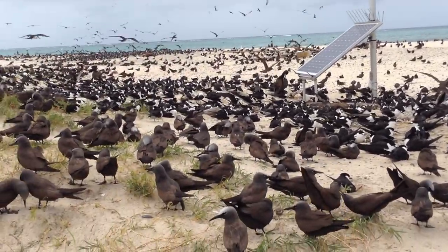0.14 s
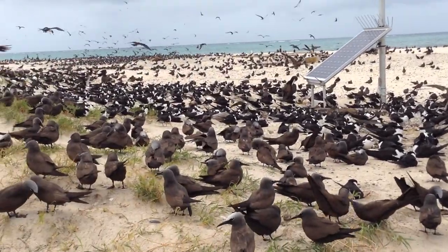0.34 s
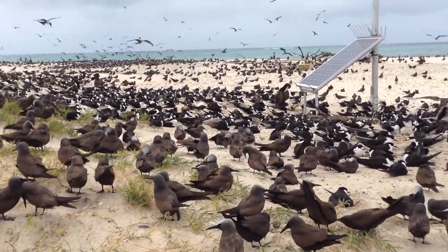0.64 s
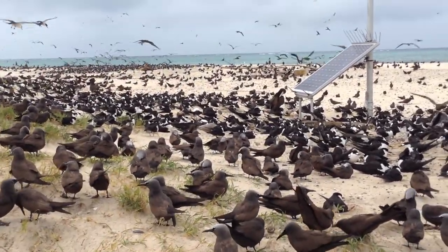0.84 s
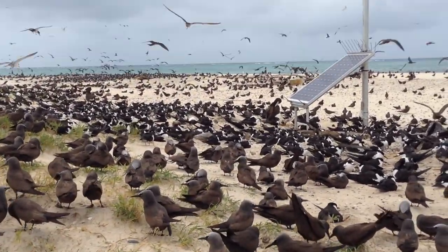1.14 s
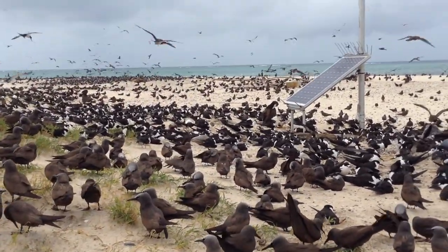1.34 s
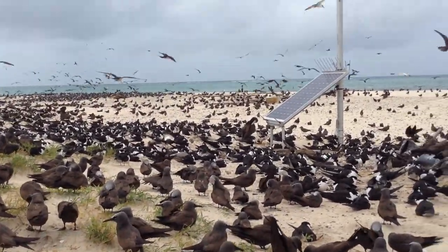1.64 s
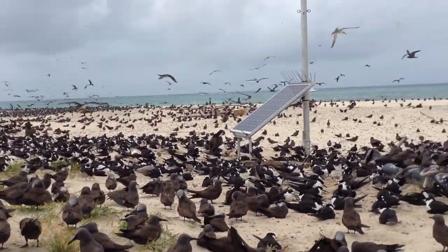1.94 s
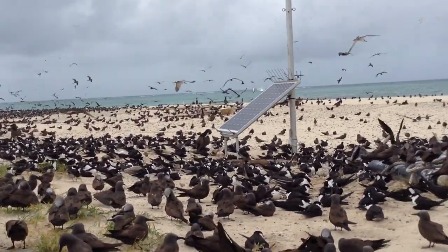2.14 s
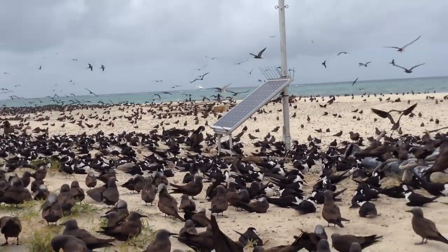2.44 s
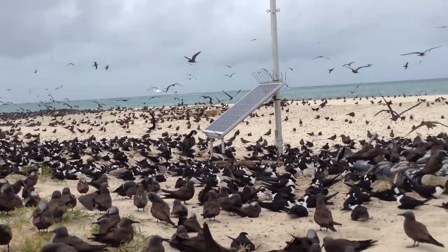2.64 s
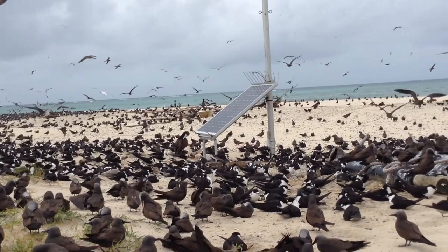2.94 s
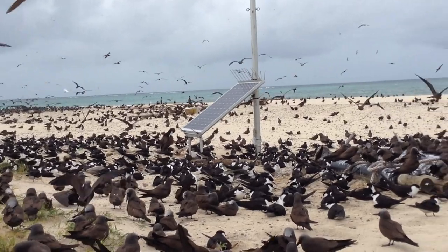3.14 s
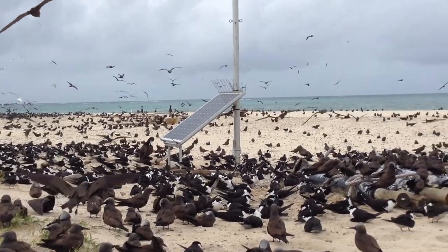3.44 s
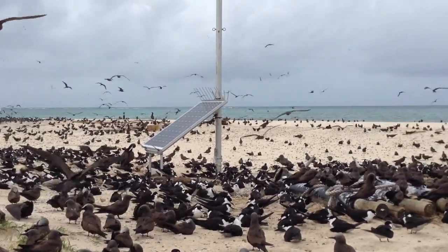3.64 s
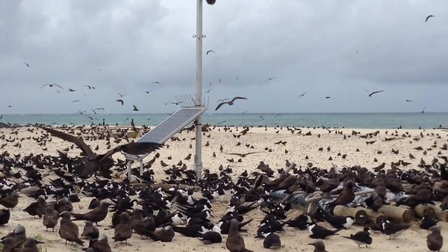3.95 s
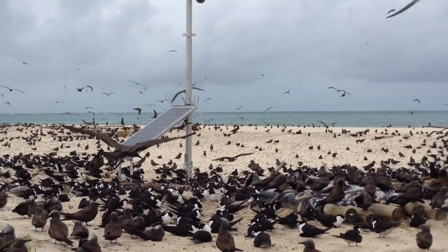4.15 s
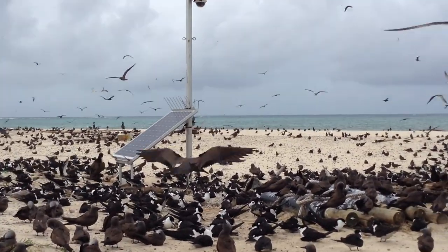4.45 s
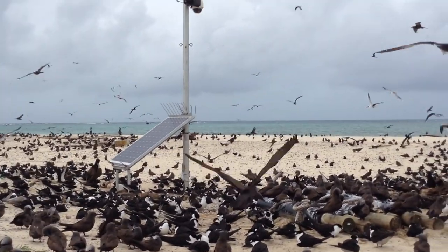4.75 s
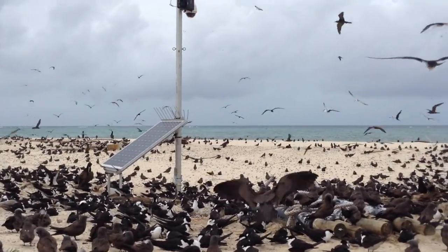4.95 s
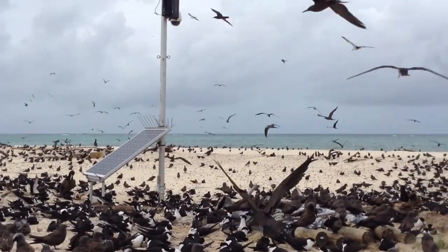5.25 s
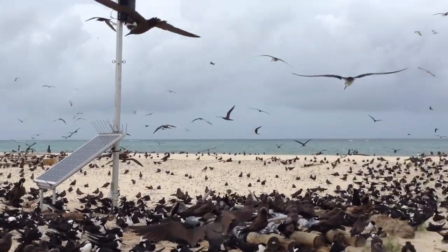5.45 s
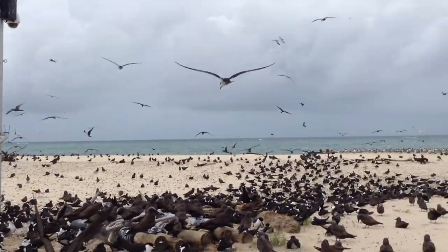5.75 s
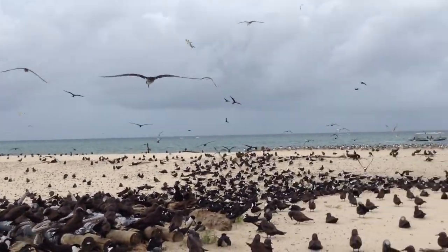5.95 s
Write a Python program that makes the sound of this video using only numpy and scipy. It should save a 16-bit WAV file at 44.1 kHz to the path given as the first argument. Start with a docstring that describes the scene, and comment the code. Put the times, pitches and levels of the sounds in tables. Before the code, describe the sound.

A dense seabird colony calls without a break outdoors by the sea. Brief, harsh, squealing cries from close birds stand out over a mass of overlapping squawks and a soft hiss of far birds and surf. Gusts hit the small microphone from the start with a low rumble and short thumps, becoming lighter later, and the bird din peaks shortly before the end.

```python
"""A windy beach with a crowded seabird colony, heard by a small mono microphone.
Near terns squeal: overtone stacks on a bending pitch, shaped by the throat, echoed by the sand.
Behind them hundreds of squawks form the din of the flock; far birds and surf blur into a hiss.
Gusts rumble and shove the microphone membrane, giving short low thumps."""
import sys
import numpy as np
from scipy import signal
from scipy.fft import rfft, irfft, next_fast_len
from scipy.io import wavfile
from scipy.ndimage import uniform_filter1d, minimum_filter1d

SR = 44100
rng = np.random.default_rng(int(sys.argv[2]) if len(sys.argv) > 2 else 0)


def wav_record(signal):
    """Record a signal, one row per channel, as 16-bit PCM in the file named by sys.argv[1]."""
    frames = np.transpose(np.atleast_2d(signal))
    bounded = np.clip(frames, -1, 1)
    # unit amplitude maps onto the largest positive 16-bit level
    quanta = np.round(bounded * 32767).astype(np.int16)
    wavfile.write(sys.argv[1], SR, quanta)


N = 268921
BAND_LIMIT_HZ = 15380


def amp(db):
    return 10 ** (np.asarray(db) / 20)


def unit_rms(x):
    return x / np.sqrt(np.mean(x ** 2) + 1e-20)


def db_at(spectrum, hz):
    f_hz, db = np.transpose(spectrum)
    return np.interp(np.log(hz + 1), np.log(f_hz + 1), db)


def add(mix, start_s, sound):
    start = round(start_s * SR)
    sound = sound[max(-start, 0):]
    part = mix[max(start, 0):][:len(sound)]
    part += sound[:len(part)]


def coloured(x, spectrum):
    """Filter x by a table of f/Hz, gain/dB."""
    size = next_fast_len(len(x))
    gain = amp(db_at(spectrum, np.fft.rfftfreq(size, 1 / SR)))
    return irfft(rfft(x, size) * gain, size)[:len(x)]


def wander(length, hz):
    """Smooth random curve, rms 1, hz knots a second."""
    knots = rng.standard_normal(800)
    position = np.arange(length) * hz / SR
    index = position.astype(int)
    blend = np.sin(np.pi / 2 * (position - index)) ** 2
    return unit_rms(knots[index] * (1 - blend) + knots[index + 1] * blend)


def far_hiss(patchy_db=1.13, flicker_db=0.5):
    """Farthest birds and surf: noise with drifting spectral patches."""
    frames = N // 128 + 5
    real, imag, patches = rng.standard_normal((frames, 257, 3)).T
    patches = unit_rms(uniform_filter1d(uniform_filter1d(patches, 8, 0), 16, 1))
    flicker = unit_rms(uniform_filter1d(rng.standard_normal(frames), 5))
    spectra = (real + 1j * imag) * amp(patchy_db * patches + flicker_db * flicker)
    return unit_rms(signal.istft(spectra, nperseg=512, noverlap=384)[1][:N])


def squawks(count=680, length=3700):
    """Birds at middle distance: harmonics 2-6, each call with its own pitch, bend and duration."""
    when, pitch, slope, arch, span, strength = rng.random((count, 6)).T[..., None]
    u = np.arange(length) / (length * (.35 + .65 * span))  # 0-1 over 30-85 ms
    bend = .6 * (slope - .4) * u + .5 * (arch - .4) * np.sin(np.pi * u)
    jitter = unit_rms(uniform_filter1d(rng.standard_normal((count, length)), size=150, axis=1))
    turns = np.cumsum((680 + 420 * pitch) * np.exp(bend + .008 * jitter), axis=1) / SR
    harmonic_db = np.array([-4.5, 0.5, -0.5, -9.5, -3.5]) + 3.1 * rng.standard_normal((count, 5))
    calls = sum(amp(harmonic_db[:, [k]]) * np.cos(2 * np.pi * (k + 2) * turns) for k in range(5))
    envelope = np.sin(np.pi * np.minimum(u, 1)) ** .6
    calls *= envelope * (1 + .25 * jitter[::-1]) * amp(7 * strength)
    out = np.zeros(N)
    for start_s, call in zip((when[:, 0] * (N + length) - length) / SR, calls):
        add(out, start_s, call)
    return unit_rms(out)


def flock(squawks_db=-6.5, split_hz=5500, surge_db=.5, surge_hz=12, flicker_db=1.5, flicker_hz=28):
    """Squawks and hiss through one filter; the level swells and ducks, the treble flickers."""
    # level and brightness of the din as heard, ducking suddenly after some strong wind buffets:
    # t/s, level/dB, treble re body/dB
    levels = [(0.0, -26, -12), (0.07, -29, -19), (0.19, -32, -11), (0.63, -29.5, -15), (0.76, -24.5, -13.5),
              (0.83, -28, -15), (1.1, -29, -15.5), (1.31, -32.5, -15.5), (1.53, -31, -16), (1.87, -29, -16),
              (1.92, -28.5, -13), (2.11, -29, -19), (2.44, -27, -15.5), (2.51, -32, -15.5),
              (2.85, -26, -17.5), (3.04, -32.5, -15), (3.38, -28.5, -13.5), (3.55, -30, -13.5),
              (4.01, -26, -15.5), (4.26, -26.5, -12.5), (4.52, -23.5, -16), (4.96, -26, -13),
              (4.98, -23.5, -12), (5.54, -23.5, -15.5), (5.55, -33.5, -15), (5.81, -28.5, -16.5),
              (6.1, -29.5, -14)]
    # colour of the din: f/Hz, gain/dB
    din_spectrum = [(290, -60), (500, -36), (545, -35), (675, -18), (926, -11), (1080, -11.5), (1270, -9.5),
                    (1360, -11.5), (2150, 0), (2830, 0.5), (3990, -6.5), (4810, -7), (6400, -10.5),
                    (11200, -20.5), (15300, -31)]
    t_s, *columns = np.transpose(levels)
    level_db, treble_db = (np.interp(np.arange(N) / SR, t_s, column) for column in columns)
    din = coloured(amp(squawks_db) * squawks() + far_hiss(), din_spectrum)
    body = signal.oaconvolve(din, signal.firwin(101, split_hz, fs=SR), "same")
    level_db += surge_db * wander(N, surge_hz)  # birds join and stop
    treble_db += flicker_db * wander(N, flicker_hz)
    return amp(level_db) * (unit_rms(body) + amp(treble_db) * unit_rms(din - body))


def buffet(db, hz, width_ms, turbulence, max_drive_db=-2.5):
    """A few uneven membrane swings, rising faster than they die, plus a puff of turbulence."""
    t_s = np.arange(-1500, 1500) / SR
    swing_hz = hz * np.exp(0.1944 * wander(len(t_s), hz))
    swing = np.cos(2 * np.pi * (np.cumsum(swing_hz) / SR + rng.random()))
    flank_s = np.where(t_s < 0, 0.82, 1.01) * width_ms / 1000
    envelope = np.exp(-4 * np.log(2) * (t_s / flank_s) ** 2)
    push = amp(min(db, max_drive_db)) * envelope * (swing + 0.5 * turbulence)
    # strong pushes drive the membrane unevenly, which sharpens them
    return push + 0.52 * push ** 2 + 0.29 * push ** 3


def wind(lumps_db=4.0, lumps_hz=60, weak_count=75):
    """Air on the microphone: lumpy rumble and weak random buffets follow the gusts; strong ones on top."""
    # turbulence spectrum: f/Hz, relative density/dB
    rumble_spectrum = [(12, -65), (20, -53), (59, -1.5), (166, 3), (238, 2), (489, -11), (536, -11.5),
                       (812, -21), (905, -25.5), (1350, -37), (1500, -31), (1950, -79), (3300, -120)]
    # wind strength: t/s, rumble level/dB
    gusts = [(0.0, -27), (0.2, -28), (0.36, -22.5), (0.85, -32), (1.03, -19.5), (1.2, -33), (1.39, -28.5),
             (1.51, -24), (1.65, -34.5), (1.87, -32.5), (2.24, -30), (2.38, -33.5), (2.56, -30.5),
             (2.87, -29.5), (4.06, -34), (4.31, -33), (4.74, -28), (5.11, -31), (5.28, -27), (5.37, -25.5),
             (5.5, -37), (6.1, -43.5)]
    # strongest shoves of air: t/s, drive before the cap/dB, f/Hz, nominal width/ms
    strong_buffets = [(0.021, -11.5, 317, 2.8), (0.133, -2.5, 286, 11.3), (0.143, -24, 283, 11),
                      (0.173, -4.5, 247, 7.1), (0.181, -12, 265, 7.4), (0.2, -16, 277, 30),
                      (0.226, -9, 290, 2.1), (0.233, -8.5, 441, 2.3), (0.242, -9.5, 229, 16),
                      (0.256, -11, 280.4, 9.6), (0.266, -12.5, 346, 16), (0.272, -11, 354.5, 7),
                      (0.334, -10, 304, 2.7), (0.359, -12.5, 324, 6.6), (0.381, -14.5, 209, 11),
                      (0.446, -0.5, 243.5, 7), (0.457, -17, 297, 3.2), (0.494, -10, 289, 6.1),
                      (0.501, -11, 265, 3.9), (0.508, -16, 248.4, 17), (0.52, -14.5, 317, 11),
                      (0.537, -12, 313, 9.1), (0.581, -7.6, 209, 8.2), (0.59, -8, 309.6, 4.7),
                      (0.669, -5.5, 242.6, 14), (0.81, -7, 316.0, 2.6), (0.825, -9, 244.0, 14),
                      (0.836, -4.5, 233.5, 3), (0.88, -19, 330, 27), (0.916, -8.2, 297, 3.8),
                      (0.925, -17.5, 257.0, 18), (0.934, -9, 295.4, 2.9), (0.943, -10.5, 327, 6.8),
                      (0.955, -7, 296.4, 1.3), (0.968, -9, 250, 19), (0.989, -17.5, 256, 21),
                      (1.036, -20, 270, 40.0), (1.06, -7.5, 322, 4.4), (1.077, -22, 231, 18.7),
                      (1.096, -8, 255, 3.3), (1.127, -20, 266, 38), (1.137, -12, 285, 4.2),
                      (1.151, -3.5, 322, 4.2), (1.17, -3, 302.5, 9.1), (1.195, 3, 327.6, 4.4),
                      (1.203, -12.5, 342.4, 36), (1.354, -11, 270, 9.6), (1.37, -12.5, 298, 4.1),
                      (1.377, -9, 256, 4.1), (1.385, -2, 521, 2), (1.387, -12.5, 436, 14.6),
                      (1.395, -2, 460, 8.9), (1.406, -6.5, 333.0, 3.5), (1.42, -3.5, 437, 1.4),
                      (1.428, -11, 314, 7.7), (1.446, -9.5, 265, 5.3), (1.454, -15, 245.0, 28),
                      (1.477, -2, 249, 3), (1.487, -6, 289, 5.2), (1.494, -17, 328, 14),
                      (1.525, -24, 245, 12), (1.558, -14, 330, 18), (1.569, -6.5, 293.7, 4.2),
                      (1.579, -4, 285, 5.2), (1.588, -6, 346, 6.3), (1.594, -12.9, 299.6, 23),
                      (1.599, -8.6, 269, 1.4), (1.617, -5, 299.0, 4.6), (1.625, -9.5, 276, 10),
                      (1.639, -6.5, 355, 5.2), (1.646, -11, 326.4, 6.4), (1.834, -17, 238.3, 15),
                      (1.945, -11, 303.3, 7.7), (1.956, -12.4, 317.6, 2.6), (1.969, -11, 250, 4.4),
                      (2.106, -10, 302, 6.5), (2.115, -21, 270, 26), (2.124, -10, 430, 3.6),
                      (2.132, -10.5, 310, 7.7), (2.144, -2, 286, 9.8), (2.159, -9.5, 270, 4.3),
                      (2.176, -12.5, 338.6, 2.9), (2.184, -14.9, 260.0, 5.0), (2.219, -13.5, 232, 21),
                      (2.236, -18.9, 328.5, 22), (2.308, -15.1, 300, 2.6), (2.322, -19.0, 269, 47),
                      (2.364, -18, 274, 5.3), (2.372, -12.5, 338, 2.7), (2.52, -20, 222.4, 7),
                      (2.55, -17.5, 249, 19), (2.599, -14, 299, 4.5), (2.78, -16.5, 205, 7.3),
                      (2.878, -2.5, 303, 5.1), (2.919, -16, 292, 56), (2.944, -7, 259, 5.7),
                      (2.956, -10, 295, 4.8), (2.966, -11, 293.0, 13.3), (2.976, -14, 308.0, 20),
                      (2.985, -5, 354, 8.6), (3.039, -16.5, 215.5, 7.6), (3.079, -16.3, 247, 7.6),
                      (3.409, -18, 277, 19), (3.416, -13.7, 263, 6.1), (3.513, -4, 239.3, 3.1),
                      (3.529, -15, 230, 8.7), (3.571, -18, 269, 8.0), (3.647, -19.5, 244, 4.7),
                      (3.798, -22, 381, 5.6), (3.83, -16, 242, 3.4), (3.942, -10, 246.6, 6.1),
                      (3.958, -7.9, 219.4, 4.4), (4.111, -16.5, 217, 5), (4.176, -19, 237.5, 4.5),
                      (4.245, -15.8, 226, 4.2), (4.274, -14, 281.5, 5.1), (4.356, -14, 279.5, 8.3),
                      (4.45, -13.5, 245, 4.7), (4.54, -16, 374, 3.5), (4.554, -9.5, 301, 9.8),
                      (4.652, -13, 239.0, 5.5), (4.695, -21, 260, 11.8), (4.767, -13.5, 241.8, 7.7),
                      (4.812, -12, 210, 7.7), (4.83, -10.5, 207.6, 11), (4.842, -18, 260, 3.3),
                      (4.849, -13.7, 233, 3.2), (4.88, -14, 276, 4.8), (4.905, -18, 264, 23),
                      (5.075, -18, 277, 12), (5.09, -10.5, 224, 5.8), (5.111, -27, 200, 25.3),
                      (5.133, -14.5, 334, 3.4), (5.276, -10, 269, 4.2), (5.39, -15.8, 272, 4.8),
                      (5.42, -14.5, 236.7, 22), (5.428, -10.5, 290.6, 4.7), (5.436, -19, 255, 46),
                      (5.524, -6, 266.7, 2.2), (5.533, -16, 269, 12.2), (5.546, -2.5, 372, 5.5),
                      (5.752, -14.5, 211.5, 4.8)]
    air = unit_rms(coloured(rng.standard_normal(N + 3000), rumble_spectrum))
    gust_s, gust_db = np.transpose(gusts)
    rumble_db = np.interp(np.arange(N) / SR, gust_s, gust_db) + lumps_db * wander(N, lumps_hz)
    out = air[:N] * amp(rumble_db)
    weak_s = rng.random(weak_count) * N / SR
    strength, pitch, span = rng.standard_normal((weak_count, 3)).T
    weak_db = np.interp(weak_s, gust_s, gust_db) + 6.5 + 3 * strength
    weak_hz, weak_ms = 260 * np.exp(0.165 * pitch), 5.6 * np.exp(0.57 * span)
    for centre_s, db, hz, width_ms in [*strong_buffets, *zip(weak_s, weak_db, weak_hz, weak_ms)]:
        start = rng.integers(N)
        add(out, centre_s - 1500 / SR, buffet(db, hz, width_ms, air[start:start + 3000]))
    return out


def cry(length_s, start_hz, middle_hz, end_hz, db, high_db, ends_db=-7, waver_db=1.2, waver_hz=45):
    """One tern syllable: 15 slightly raspy harmonics on a bending pitch, shaped by the throat."""
    # throat response: f/Hz, gain/dB
    throat = [(700, 5), (1100, 0), (1900, 6.5), (2300, 19.5), (2900, 19.5), (3350, 18.5), (3800, 10.5),
              (4400, -4), (5500, -2), (7500, -1), (9000, -4), (12000, -11), (15000, -10)]
    length = round(length_s * SR)
    u = np.linspace(-1, 1, length)
    hz = middle_hz + (end_hz - start_hz) / 2 * u + ((start_hz + end_hz) / 2 - middle_hz) * u ** 2
    level_db = db + ends_db * u ** 4 + waver_db * wander(length, waver_hz)
    jitter, rasp = wander(length, 250), wander(length, 250)
    turns = np.cumsum(hz * (1 + .003 * jitter)) / SR
    order = np.arange(1, 16)[:, None]
    gain = amp(db_at(throat, order * hz) + 6 * (order == 3))  # harmonic 3 carries the cry
    gain *= order * hz < BAND_LIMIT_HZ
    low, high = gain[:4], gain[4:] * amp(-3 * order[4:])
    low = low / np.linalg.norm(low, axis=0)
    high = high / np.linalg.norm(high, axis=0) * amp(high_db)
    phase = 2 * np.pi * (order * turns + rng.random(order.shape))
    voice = np.sqrt(2) * (np.vstack([low, high]) * np.cos(phase)).sum(0)
    return voice * (1 + .2 * rasp) * amp(level_db) * signal.windows.tukey(length, .15)


def near_terns(echo_db=-9, echo_s=90 / SR):
    """The clearest cries, each with a weaker copy thrown back by the sand."""
    # syllables: t/s, length/s, start f/Hz, middle f/Hz, end f/Hz, level/dB, harmonics 5-15 re 1-4/dB
    syllables = [ (0.0, 0.05, 841, 830, 826, -35, -17), (0.437, 0.043, 737, 785, 734, -46, 6),
                 (0.618, 0.058, 755, 781, 880, -33, -15), (0.679, 0.045, 760, 743, 710, -39, 7),
                 (0.724, 0.089, 745, 864, 777, -32.5, -1.5), (0.869, 0.023, 896, 930, 980, -37, -16),
                 (0.917, 0.064, 878, 1000, 1026, -35.5, -26), (0.962, 0.059, 602, 718, 788, -29, -18),
                 (1.025, 0.042, 804, 764, 718, -21.5, -26), (1.02, 0.062, 1100, 954, 990, -34.5, -20),
                 (1.08, 0.048, 727, 893, 1090, -26, -19), (1.156, 0.041, 1030, 936, 820, -23, -16),
                 (1.22, .03, 850, 815, 780, -30, -22), (1.252, 0.069, 840, 892, 934, -33.5, -10),
                 (1.708, .06, 950, 1008, 990, -32.5, -23), (1.79, 0.054, 1045, 1020, 1020, -26.5, -12),
                 (1.815, .14, 1030, 1088, 1097, -26.5, -12.5), (1.978, 0.051, 1007, 917, 880, -24, -9.5),
                 (2.025, .045, 900, 965, 960, -36, -16), (2.085, 0.061, 930, 815, 875, -31, -24),
                 (2.119, 0.048, 866, 881, 820, -31, -26), (2.214, 0.072, 670, 724, 650, -32.5, -2),
                 (2.277, 0.063, 1016, 960, 803, -31.5, -10), (2.764, 0.14, 858, 930, 900, -36, -5),
                 (3.408, 0.046, 964, 993, 980, -32.5, -8), (3.438, 0.059, 742, 780, 800, -39, -6),
                 (3.761, .042, 950, 935, 912, -27.5, -6.5), (3.798, 0.073, 937, 980, 1050, -34, -11),
                 (3.9, 0.049, 523, 594, 730, -33.5, -14), (3.957, 0.07, 723, 709, 662, -29.5, -1.5),
                 (4.017, 0.036, 646, 695, 770, -30, -8), (4.072, 0.044, 725, 800, 770, -37, 0),
                 (4.118, 0.031, 755, 730, 700, -31.5, 0), (4.325, 0.084, 758, 774, 730, -31, -8),
                 (4.46, 0.065, 902, 995, 900, -29.5, -8), (4.97, 0.029, 1067, 1103, 1050, -35.5, 5),
                 (5.201, 0.034, 900, 925, 985, -26, -27), (5.228, 0.052, 890, 835, 850, -31, -22),
                 (5.3, 0.091, 760, 924, 969, -41, -5), (5.39, 0.059, 762, 920, 1050, -26, -16),
                 (5.45, .048, 820, 940, 940, -36, -20), (5.73, 0.034, 786, 903, 1000, -36.5, -13),
                 (5.775, 0.037, 713, 706, 680, -35, 1.5), (5.877, .045, 861, 955, 1020, -34, -6), ]
    out = np.zeros(N)
    for start_s, *syllable in syllables:
        voice = cry(*syllable)
        add(out, start_s, voice)
        add(out, start_s + echo_s, amp(echo_db) * voice)
    return out


def scene():
    return (near_terns() + flock() + wind())[None]


def record(dry, low_cut_hz=125, rumble_db=-62, rumble_hz=70, ceiling=.7):
    """Microphone: bass cut, faint heaving rumble, limiter on the strongest buffets, band limit."""
    mic = signal.sosfilt(signal.butter(4, low_cut_hz, "high", fs=SR, output="sos"), dry)
    heave_db = 3.3 * wander(N, hz=6.5)
    rumble = signal.sosfilt(signal.butter(2, rumble_hz, fs=SR, output="sos"), rng.standard_normal(N))
    mic += amp(rumble_db + heave_db) * unit_rms(rumble)
    gain = np.minimum(ceiling / (abs(mic) + 1e-9), 1)
    limited = mic * uniform_filter1d(minimum_filter1d(gain, size=301), size=300)
    lowpass = signal.firwin(1023, BAND_LIMIT_HZ, window=("kaiser", 10), fs=SR)
    return signal.oaconvolve(limited, lowpass[None], "same")


dry = scene()
out = record(dry)
wav_record(out)
```